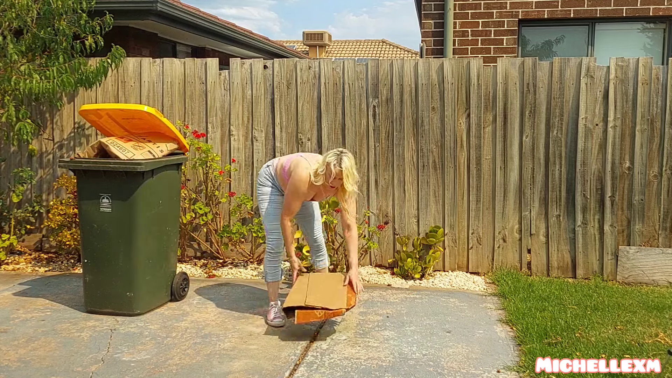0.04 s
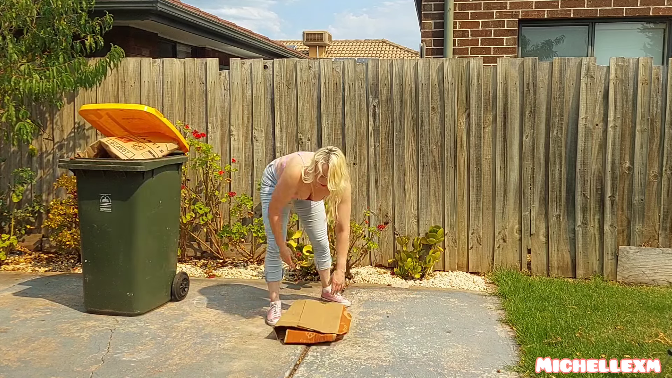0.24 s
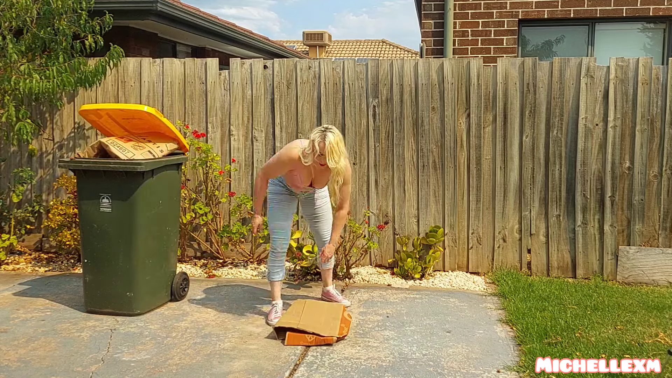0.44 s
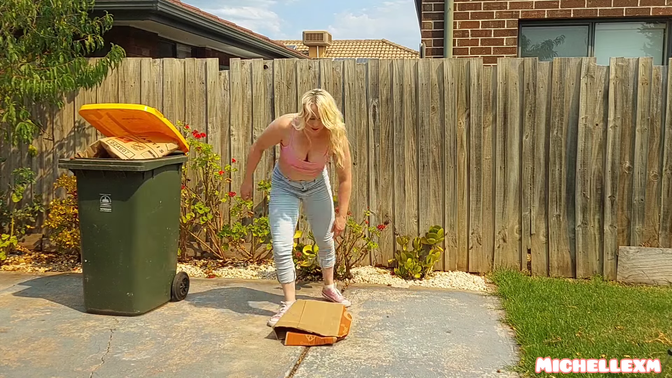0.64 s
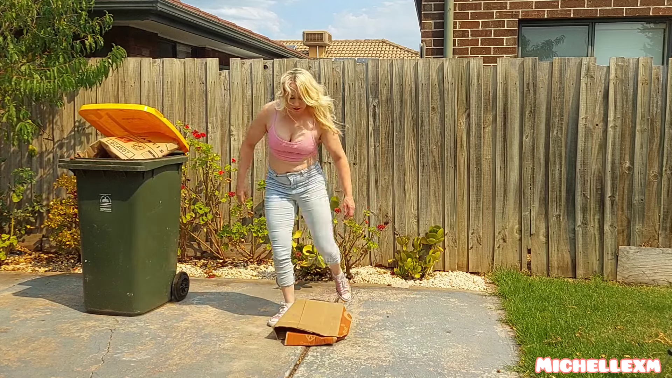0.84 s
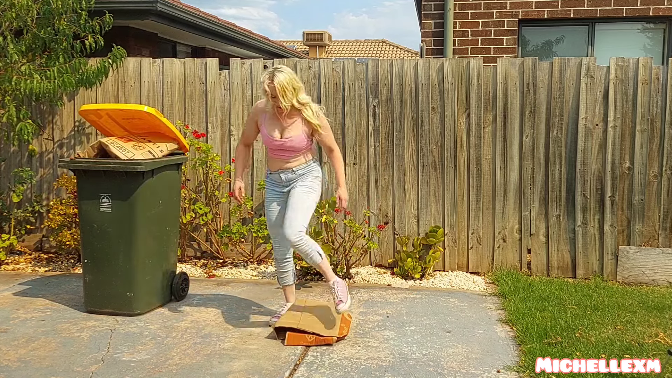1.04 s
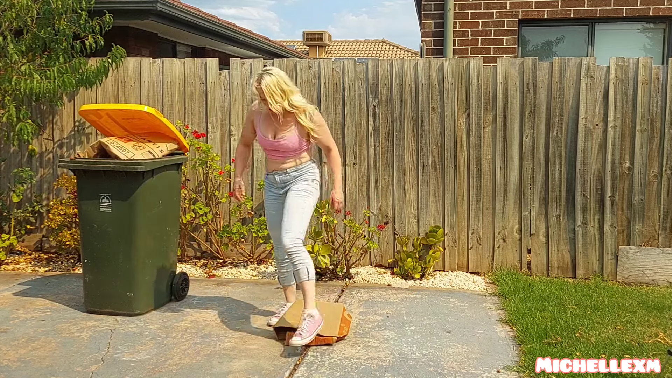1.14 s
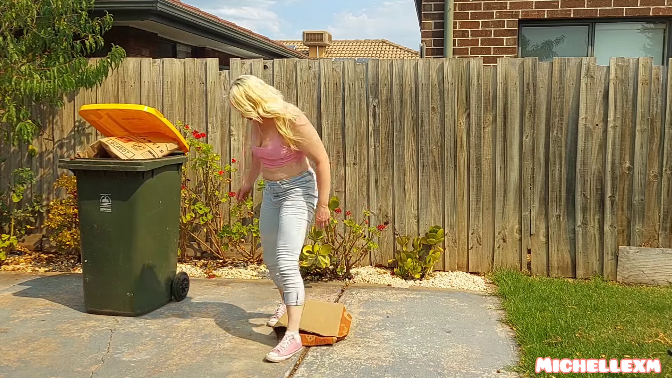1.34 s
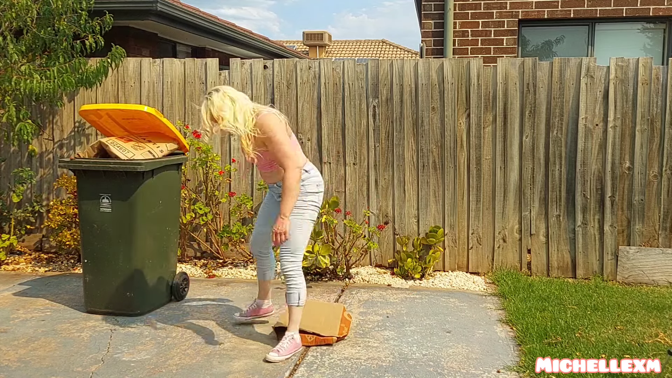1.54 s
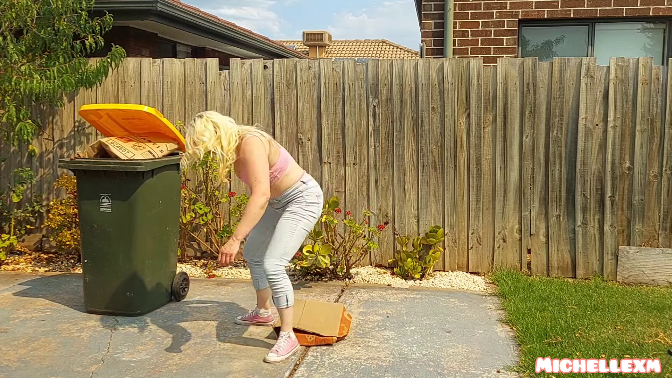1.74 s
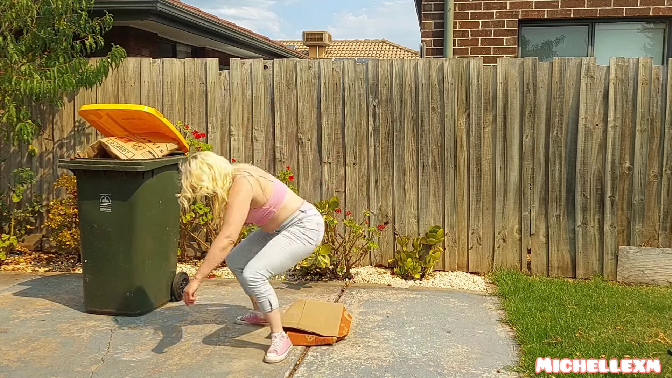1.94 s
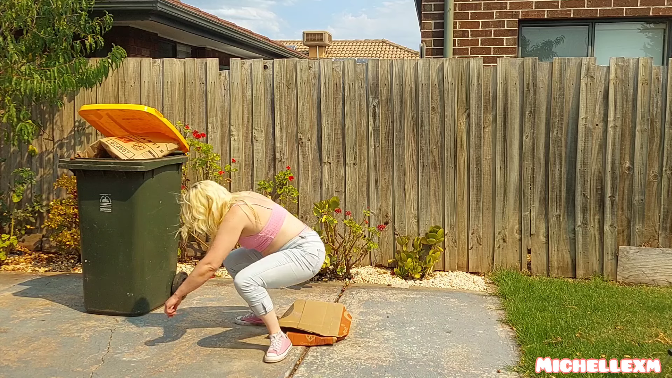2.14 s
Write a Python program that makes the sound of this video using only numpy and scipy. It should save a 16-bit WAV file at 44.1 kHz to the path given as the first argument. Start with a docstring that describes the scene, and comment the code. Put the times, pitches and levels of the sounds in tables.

```python
"""A cardboard box drops on concrete in a yard: an edge touches, the walls rattle, it slaps down flat.
Knocks are pressure pulses that ring decaying wall modes, with treble noise cracks; rattle is dense noise grains.
Clothes rustle throughout (fine noise grains); faint narrow hisses follow the drop, then light shoe taps
(softer knocks). Far off, a motor hums and a car nears (noise bands) in a low rumble of traffic (coloured noise).
A fence returns the foreground as a dying noise tail; the picture is built as mid and side."""
import sys
import numpy as np
from scipy import signal
from scipy.io import wavfile
from scipy.ndimage import uniform_filter1d

SR = 44100
rng = np.random.default_rng(int(sys.argv[2]) if len(sys.argv) > 2 else 0)


def convert_level_to_amplitude(level_db):
    """Map a level in decibels to its linear amplitude factor."""
    exponent = np.asarray(level_db, float) / 20
    return 10 ** exponent


def file_out(sig):
    """Save sig as 16-bit WAV at sys.argv[1]."""
    # one column per channel
    cols = np.atleast_2d(sig).T
    # limit, then scale
    lim = np.clip(cols, -1, 1)
    pcm = np.round(lim * 32767).astype(np.int16)
    wavfile.write(sys.argv[1], SR, pcm)


N = 97020
T = np.arange(N) / SR  # s

# Far traffic noise, spectrum: f/Hz, relative level/dB per Hz
TRAFFIC_SPECTRUM = [(20, -10.5), (33, -25), (44, -54), (80, -18.5), (145, 1), (180, -12.5), (240, -9),
                    (310, -17.5), (520, -17), (800, -25.5), (1300, -37.5), (2000, -38.5), (3000, -60.5),
                    (5000, -82), (6500, -119), (8000, -91), (11000, -60), (13000, -100), (16000, -82)]
TRAFFIC_DB, PATCH_DB = -43, 0.78  # rms level; rms unevenness of its patches
# Deep far rumble as it swells: t/s, level/dB rms
RUMBLE_LEVEL = [
    [(0.0, -23), (0.014, -43), (0.03, -70), (0.054, -43), (0.072, -57), (0.092, -64), (0.116, -55),
     (0.15, -49)],
    [(0.3, -38.5), (0.522, -59), (0.554, -36.5), (0.802, -58), (1.48, -49), (1.574, -30), (1.686, -47),
     (2.008, -39), (2.082, -45), (2.2, -40)],
]
RUMBLE_HZ, RUMBLE_WIDTH_HZ = 87, 43.5
# Main hum of the distant motor as it wavers: t/s, level/dB rms
MOTOR_LEVEL = [
    [(0.0, -46), (0.094, -34), (0.15, -44)],
    [(0.3, -40.5), (0.506, -57.5), (0.532, -46), (1.378, -52), (1.4, -41), (1.844, -43.5), (1.94, -52),
     (2.04, -43), (2.2, -53)],
]
MOTOR_HZ, MOTOR_WIDTH_HZ = 147.1, 2.48
# Other far wavering tones: f/Hz, width of each resonance/Hz, level/dB rms
WAVERING_TONES = [(43.8, 24, -46.5), (96.8, 8.5, -53.5), (190.8, 10.5, -52.5), (225.3, 3.94, -52),
                  (283, 23, -63.5), (393.3, 20.3, -61), (7940, 310, -85)]
CAR_HZ, CAR_WIDTH_HZ = 1060, 930
CAR_START_DB, CAR_GROWTH_DB_PER_S = -83, 9.5

# Rustle of clothes and shoe: t/s, dull level/dB, bright level/dB, brightest level/dB
RUSTLE_LEVELS = [
    [(0.0, -53.5, -66, -74), (0.01, -70, -68.5, -70), (0.078, -66, -63.5, -62), (0.11, -72, -63, -62),
     (0.128, -81, -72, -71), (0.14, -69, -63.5, -66)],
    [(0.3, -59, -69, -71), (0.388, -57, -67.5, -79), (0.668, -72.5, -82, -100), (0.762, -72.5, -84, -96),
     (0.82, -64.5, -71, -87), (0.878, -66, -84.5, -96), (1.104, -79, -86.5, -100),
     (1.25, -67.5, -72.5, -91), (1.362, -62.5, -66, -70), (1.45, -67, -74.5, -79),
     (1.794, -80, -83.5, -101), (1.81, -67, -67.5, -82), (1.852, -66, -76, -83), (1.858, -68, -67, -73),
     (1.888, -68.5, -80, -88), (2.19, -100, -85, -90)],
]
# Dull, bright and brightest rustle, a spectrum each: f/Hz, relative level/dB per Hz
RUSTLE_SPECTRA = [
    [(1200, 3), (2600, 4.5), (3600, -0.5), (5100, 3), (6300, -5.5), (8000, -3.5), (10000, -20.5)],
    [(6000, -21.5), (8800, -11), (10700, -4.5), (12000, -9), (14000, -44)],
    [(9000, -24), (11600, -3), (12500, 3), (13800, -3), (16000, -16)],
]
RUSTLES_PER_S, RUSTLE_SPREAD_DB, RUSTLE_T60 = 5900, 0, 0.0028  # t60 in s

# Walls rattling as the box settles: t/s, boom level/dB, body level/dB, treble level/dB
RATTLE_LEVELS = [(.159, -85, -95, -100), (.161, -44, -33.5, -46.5), (.176, -49, -32.5, -44.5),
                 (.190, -26.5, -34, -50.5), (.202, -39, -39.5, -59), (.205, -16, -18, -48),
                 (.215, -26, -28, -41), (.228, -34, -21, -40.5), (.242, -27, -27.5, -50),
                 (.250, -33, -37, -47.5), (.290, -36.5, -42.5, -58.5), (.320, -63, -51.5, -98),
                 (.375, -43, -52, -68), (.5, -93, -79, -107)]
# Low boom of the rattle, spectrum: f/Hz, relative level/dB per Hz
BOOM_SPECTRUM = [(35, -45), (80, -19.5), (210, 7), (400, 1), (700, -16.5), (2000, -81)]
# Body of the rattle, spectrum: f/Hz, relative level/dB per Hz
BODY_SPECTRUM = [(150, -40), (400, 0), (800, 3), (1300, -3), (2100, -9.5), (3500, -23), (7000, -57)]
# Treble of the rattling card, spectrum: f/Hz, relative level/dB per Hz
TREBLE_SPECTRUM = [(1760, -25), (3000, -4.5), (3520, 3.5), (4000, -0.5), (5440, 2), (8950, -11),
                   (11200, 5.5), (12400, -4), (16000, -5.5)]
RATTLES_PER_S, RATTLE_SPREAD_DB, RATTLE_T60 = 5600, 4, 0.023  # t60 in s

# Knocks on the box: t/s, pulse level/dB before push and ring gains, crack energy/dB, pulse time scale/ms
BOX_KNOCKS = [(.1612, -31, -35, 0.39), (.2040, -27.5, -20, 0.21), (0.2114, -25.5, -36, 2.94),
              (.2165, -18, -44, 0.92), (0.219, -37, -42, 4.4), (0.2260, -8, -12, 0.35),
              (0.2384, -23.5, -40, 0.94), (.2575, -40, -38, 0.68), (0.3743, -40.5, -55, .9),
              (.5495, -67, -42, 0.7)]
# Light shoe taps: t/s, pulse level/dB before push and ring gains, crack energy/dB, pulse time scale/ms
SHOE_TAPS = [(1.271, -36, -58, 0.66), (1.3110, -37, -53, 2.2), (1.6587, -34, -62, 0.59),
             (1.809, -42, -40.5, 1.2), (1.8588, -42.5, -37, 1.3)]
# Ringing modes of the box walls: f/Hz, level/dB before the ring gain, t60/s
BOX_MODES = [(83.5, 9, 0.065), (205, 9, 0.016), (334, -25, 0.01), (420, 2, 0.027), (578, -14.5, 0.064),
             (695, -5.5, 0.041), (763, -9, 0.022), (1104, -13, 0.044), (1320, -6.5, 0.0068),
             (1630, -16, 0.019), (1930, -11.5, 0.015), (2290, -38, 0.012)]
# Treble crack of a knock, spectrum: f/Hz, relative level/dB per Hz
CRACK_SPECTRUM = [(1500, -22), (3000, -9.5), (5500, -4), (8500, -22.5), (11000, -11.5), (12600, 2),
                  (14200, -15), (16000, -30)]
KNOCK_RING_DB, KNOCK_PUSH_DB = -4.5, -8
TAP_RING_DB, TAP_PUSH_DB = -8, -4
CRACK_T60, SPREAD_T60 = 0.0028, 0.05  # s: treble crack; noise that spreads the body into the side

# Faint narrow hisses, perhaps air or card sliding in a crease: start t/s, length/s, peak level/dB rms, start f/Hz
NARROW_HISSES = [(0.293, 0.31, -61.5, 1784), (.35, 0.11, -58.5, 1947), (0.785, 0.2, -68, 1820)]
HISS_WIDTH_HZ, HISS_SAG_HZ_PER_S = 120, 370

FENCE_DB, FENCE_T60 = -21, 0.11  # t60 in s
# Side channel of the foreground (box, shoe, clothes): f/Hz, level over mid/dB
FOREGROUND_SIDE = [(60, -18), (110, -35), (200, -12), (380, -14), (700, -8.5), (1290, -7), (2380, -5.5),
                   (4400, -3.5), (8120, 2), (15000, -1)]
# Side channel of the far background: f/Hz, level over mid/dB
BACKGROUND_SIDE = [(60, -8.5), (110, -20.5), (200, -11.5), (380, -8), (700, 2), (1290, 4), (2380, -0.5),
                   (4400, 7.5), (8120, -4), (15000, 2)]
LEAN_DB = -0.08  # half of left minus right
LOW_CUT_HZ = 61.5


def evened(x):
    """Scales to an overall rms of 1."""
    return x / np.sqrt(np.mean(x ** 2) + 1e-20)


def read(points, hz):
    """A spectrum table at the frequencies hz, interpolated over log frequency."""
    f, value = np.transpose(points)
    return np.interp(np.log(hz + 1), np.log(f + 1), value)


def curve(rows, column=1):
    """Gain over time from a dB column, held outside the table."""
    rows = np.vstack(rows)
    return convert_level_to_amplitude(np.interp(T, rows[:, 0], rows[:, column]))


def colour(x, spectrum):
    """Causal minimum-phase filter with the gain of a spectrum table."""
    hz = abs(np.fft.fftfreq(8192, 1 / SR))
    log_gain = np.log(convert_level_to_amplitude(np.maximum(read(spectrum, hz), -100)))
    # the Hilbert transform of the log gain gives the phase
    response = np.exp(np.conj(signal.hilbert(log_gain)))
    taps = np.fft.ifft(response).real[:4096]
    return signal.oaconvolve(x, taps[None], axes=1)[:, :N]


def burst(t60):
    """Exponentially dying noise of energy 1."""
    t = np.arange(8000) / SR
    noise = rng.standard_normal(len(t)) * convert_level_to_amplitude(-60 * t / t60)
    return noise / np.linalg.norm(noise)


def resonate(x, hz, width):
    """A resonance of gain 1, fixed or moving: shift to 0 Hz, low-pass, shift back."""
    turn = np.exp(2j * np.pi * np.cumsum(hz * np.ones(N)) / SR)
    r = np.exp(-np.pi * width / SR)
    return 2 * (turn * signal.lfilter([1 - r], [1, -r], x / turn)).real


def noise_band(hz, width):
    """Mid and side noise through two equal resonances, rms 1: the narrower, the more like a wavering tone."""
    once = resonate(rng.standard_normal((2, N)), hz, width)
    return evened(resonate(once, hz, width))


def grains(per_s, spread_db, t60):
    """Random dying puffs of noise, more unequal with spread; mid and side share the puffs, not the noise."""
    struck = rng.random(N) < per_s / SR
    power = convert_level_to_amplitude(2 * spread_db * np.minimum(rng.exponential(1, N), 5)) * struck
    power = signal.lfilter([1], [1, -convert_level_to_amplitude(-120 / (t60 * SR))], power)
    return np.sqrt(power) * rng.standard_normal((2, N))


def traffic():
    """Far traffic: noise with slightly uneven patches in time and frequency."""
    frames = N // 256 + 5
    real, imaginary, patches = rng.standard_normal((frames, 513, 2, 3)).T
    patches = uniform_filter1d(patches, size=10, axis=1)  # across frequency
    patches = evened(uniform_filter1d(patches, size=12, axis=2))  # across time
    spectrum = (real + 1j * imaginary) * convert_level_to_amplitude(PATCH_DB * patches)
    wash = signal.istft(spectrum, nperseg=1024, noverlap=768)[1][:, :N]
    return convert_level_to_amplitude(TRAFFIC_DB) * evened(colour(wash, TRAFFIC_SPECTRUM))


def rumble():
    """Deep far rumble: a broad low noise band that swells and sinks."""
    return curve(RUMBLE_LEVEL) * noise_band(RUMBLE_HZ, RUMBLE_WIDTH_HZ)


def motor():
    """Distant motor hum: noise through one sharp resonance, with a level that wavers."""
    hum = resonate(rng.standard_normal((2, N)), MOTOR_HZ, MOTOR_WIDTH_HZ)
    return curve(MOTOR_LEVEL) * evened(hum)


def wavering_tones():
    """Further far tones: noise bands whose random beating makes them waver."""
    return sum(convert_level_to_amplitude(db) * noise_band(hz, width) for hz, width, db in WAVERING_TONES)


def car():
    """A car nears: its tyre noise, a broad noise band, grows steadily in dB."""
    return convert_level_to_amplitude(CAR_START_DB + CAR_GROWTH_DB_PER_S * T) * noise_band(CAR_HZ, CAR_WIDTH_HZ)


def yard():
    """The far background of the yard; mid and side are unrelated noise."""
    return traffic() + rumble() + motor() + wavering_tones() + car()


def rustle():
    """Fine friction of cloth and sole: equal tiny grains in three bands, each with its own level."""
    rub = grains(RUSTLES_PER_S, RUSTLE_SPREAD_DB, RUSTLE_T60)
    return sum(evened(colour(rub, spectrum)) * curve(RUSTLE_LEVELS, column)
               for column, spectrum in enumerate(RUSTLE_SPECTRA, 1))


def fence(foreground):
    """The fence throws the foreground back as a dying noise tail."""
    return convert_level_to_amplitude(FENCE_DB) * signal.oaconvolve(foreground, burst(FENCE_T60)[None], axes=1)[:, :N]


def rattle():
    """Dense small slaps of the flaps: unequal grains with short tails, in three bands."""
    slaps = grains(RATTLES_PER_S, RATTLE_SPREAD_DB, RATTLE_T60)
    spectra = [BOOM_SPECTRUM, BODY_SPECTRUM, TREBLE_SPECTRUM]
    return sum(evened(colour(slaps, spectrum)) * curve(RATTLE_LEVELS, column)
               for column, spectrum in enumerate(spectra, 1))


def box_ring():
    """Impulse response of the box walls: decaying sines, stronger with frequency."""
    t = T[:8000]
    return sum(convert_level_to_amplitude(db - 60 * t / t60) * np.sin(2 * np.pi * hz * t) * 2 * np.pi * hz / SR
               for hz, db, t60 in BOX_MODES)


def knocks(rows, ring_db, push_db):
    """Each knock pushes air, rings the walls of the box and cracks in the treble."""
    push, crack = np.zeros(N), np.zeros((2, N))
    for start, db, crack_db, ms in rows:
        at = round(start * SR)
        u = 3 * np.arange(800) / SR / (ms / 1000)
        # pressure rises, then swings negative and dies away
        push[at:at + 800] += convert_level_to_amplitude(db) * np.e * u * (2 - u) * np.exp(-u)
        crack[:, at:at + 8000] += convert_level_to_amplitude(crack_db) * np.array([burst(CRACK_T60), burst(CRACK_T60)])
    body = convert_level_to_amplitude(push_db) * push + convert_level_to_amplitude(ring_db) * signal.oaconvolve(push, box_ring())[:N]
    body_side = signal.oaconvolve(body, burst(SPREAD_T60))[:N]
    # divide by the filter's own energy, so that the table sets the crack's
    filter_norm = np.linalg.norm(colour((T == 0)[None], CRACK_SPECTRUM))
    return np.array([body, body_side]) + colour(crack, CRACK_SPECTRUM) / filter_norm


def hisses():
    """Noise in a narrow resonance that sags while it swells and fades."""
    out = np.zeros((2, N))
    for start, length, db, hz in NARROW_HISSES:
        sag_hz = hz - HISS_SAG_HZ_PER_S * (T - start)
        swell = np.sin(np.pi * np.clip((T - start) / length, 0, 1))
        out += convert_level_to_amplitude(db) * swell * noise_band(sag_hz, HISS_WIDTH_HZ)
    return out


def scene():
    """Foreground with its fence return, over the far yard; mid and side become left and right."""
    foreground = rustle() + rattle() + knocks(BOX_KNOCKS, KNOCK_RING_DB, KNOCK_PUSH_DB) + hisses()
    foreground = foreground - knocks(SHOE_TAPS, TAP_RING_DB, TAP_PUSH_DB)  # taps have the opposite polarity
    foreground = foreground + fence(foreground)
    background = yard()
    mid = foreground[0] + background[0]
    side = colour(foreground[1:], FOREGROUND_SIDE)[0] + colour(background[1:], BACKGROUND_SIDE)[0]
    return np.array([convert_level_to_amplitude(LEAN_DB) * (mid + side), convert_level_to_amplitude(-LEAN_DB) * (mid - side)])


def low_pass(x):
    """Removes everything above the highest recorded frequency."""
    return signal.sosfilt(signal.butter(12, 15700, fs=SR, output="sos"), x)


def record(dry):
    """The microphone cuts the deepest bass with a third-order high-pass."""
    low_cut = signal.butter(N=3, Wn=LOW_CUT_HZ, btype="high", fs=SR, output="sos")
    mix = signal.sosfilt(low_cut, dry)
    return low_pass(mix)


dry = scene()
out = record(dry)
file_out(out)
```